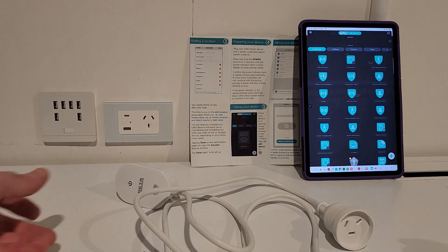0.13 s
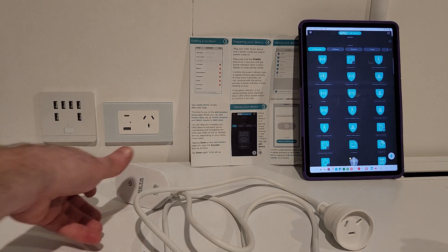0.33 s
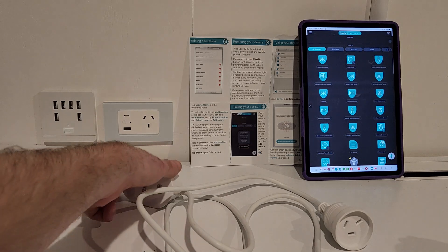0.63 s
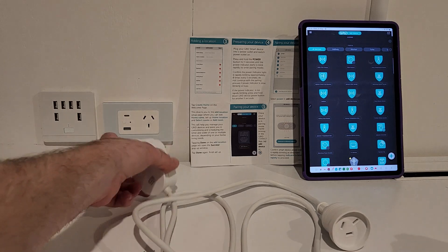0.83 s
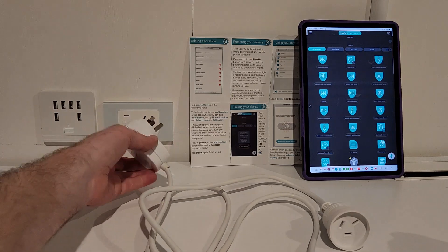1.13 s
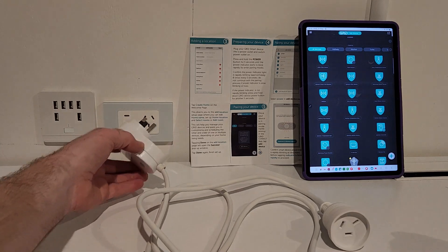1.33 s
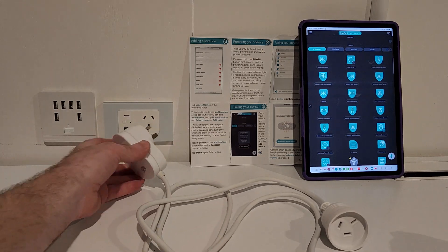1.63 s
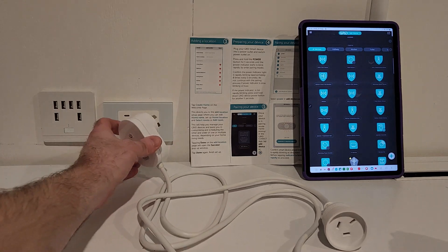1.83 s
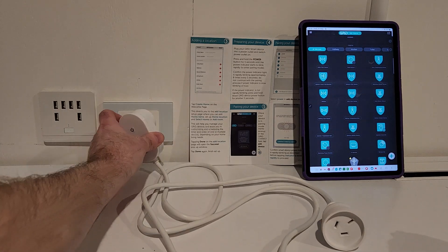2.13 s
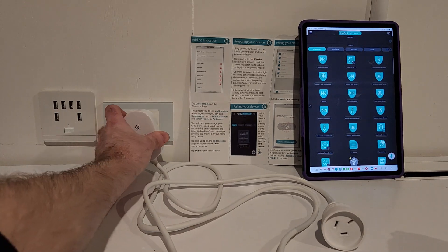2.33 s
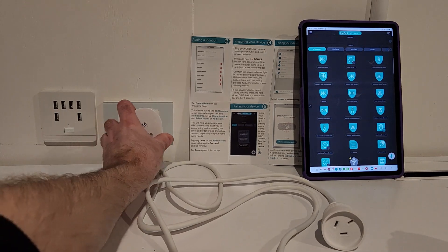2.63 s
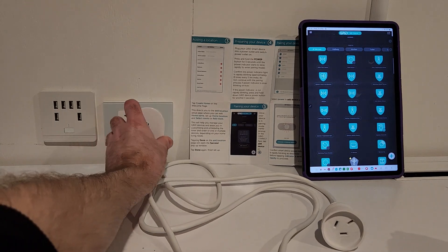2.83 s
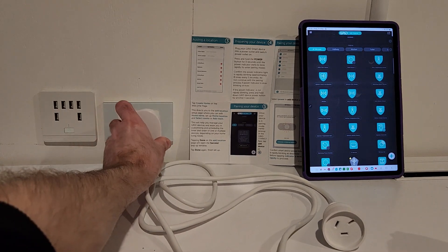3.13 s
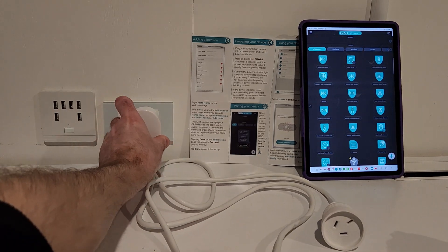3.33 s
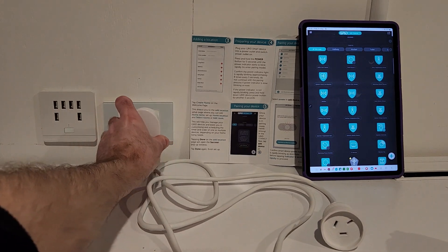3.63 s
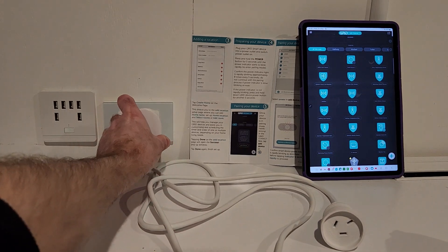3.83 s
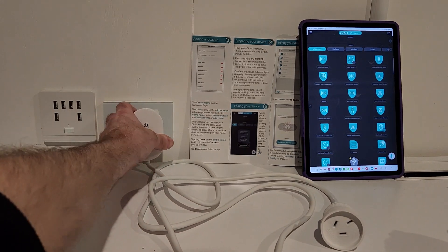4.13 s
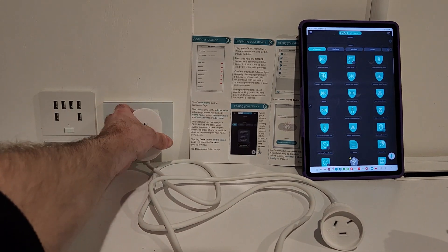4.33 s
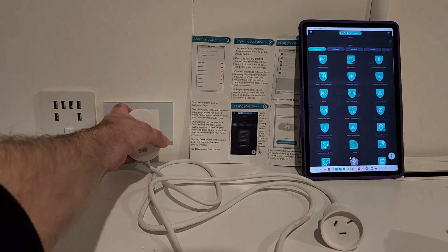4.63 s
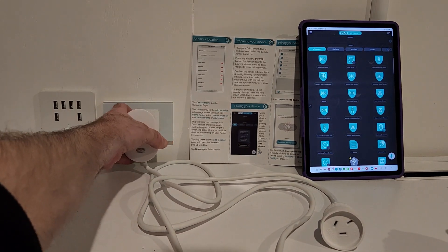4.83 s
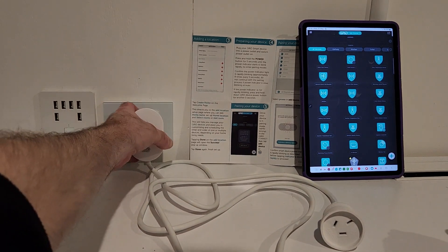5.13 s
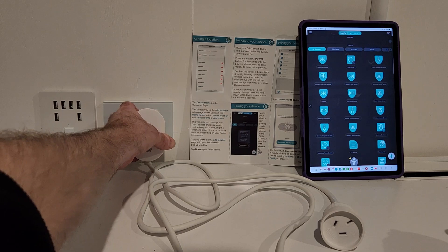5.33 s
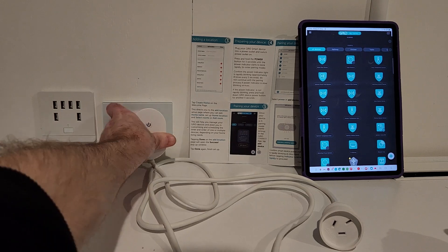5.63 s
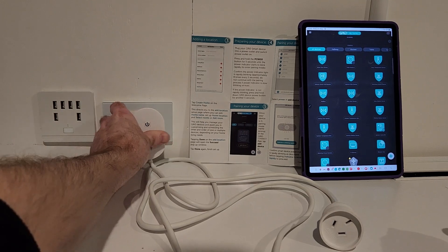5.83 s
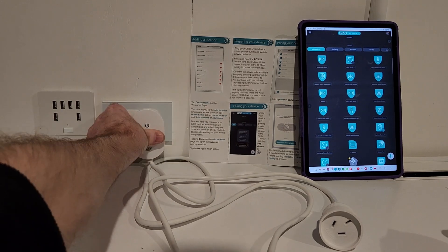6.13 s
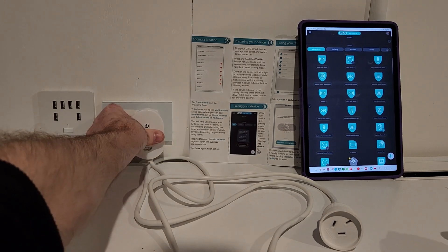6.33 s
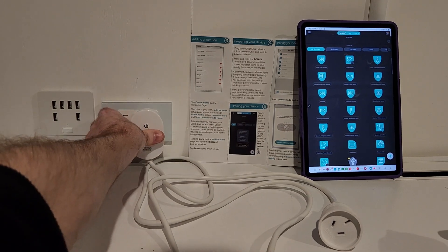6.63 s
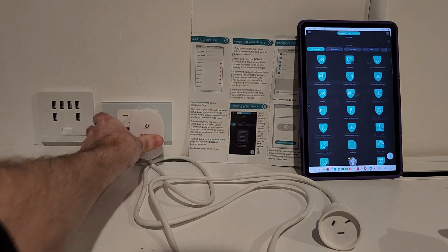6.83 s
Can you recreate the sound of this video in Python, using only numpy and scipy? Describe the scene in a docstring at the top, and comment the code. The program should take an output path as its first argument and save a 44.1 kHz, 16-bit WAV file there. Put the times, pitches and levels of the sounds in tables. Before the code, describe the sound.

A phone-like stereo microphone about half a metre away catches a plug being handled and pressed into a socket. Crisp plastic clacks come first, then soft gritty slides, a dull hollow knock, scattered taps and scrapes, and finally two heavy boxy thumps with clicking pins. The small room adds a short tail; distant traffic hums faintly through the walls.

```python
"""Small room, half a metre from a phone: a hand lifts a plastic plug off a desk and works it into a wall socket.
Pushes knock a hollow panel (decaying modes); shell and pins click (tick, grit, short modes).
Fingers and cable rub (slip noise through resonances); the room answers with a noise tail.
Traffic through the walls: drones (gliding sines), rumble, roar and whine (coloured noise), over microphone hiss."""
import sys
import numpy as np
from scipy import signal
from scipy.fft import rfft, irfft
from scipy.io import wavfile
from scipy.ndimage import uniform_filter1d

SR = 44100
rng = np.random.default_rng(int(sys.argv[2]) if len(sys.argv) > 2 else 0)


def unload_wav(signal):
    """Save mono or channel-first audio to the path in sys.argv[1] as 16-bit WAV at rate SR, clipped to [-1, 1]."""
    wavfile.write(
        sys.argv[1],
        SR,
        np.round(np.clip(np.atleast_2d(signal).T, -1, 1) * 32767).astype(np.int16),
    )


N = 308700
T = np.arange(N) / SR
RING_T = np.arange(int(.25 * SR)) / SR  # time axis of one blow


def undb(db):
    """Amplitude factor of a level in dB."""
    return 10 ** (np.asarray(db) / 20)


def on_log(table, hz, column):
    """Read a table between its rows on a log-frequency axis."""
    table = np.array(table, float)
    return np.interp(np.log(np.maximum(hz, 1)), np.log(table[:, 0]), table[:, column])


def walk(rate_hz):
    """Random levels held 1 / rate_hz s and slewed twice; spread near 1."""
    hold = int(SR / rate_hz)
    steps = np.repeat(rng.standard_normal(N // hold + 1), hold)
    return 1.514 * uniform_filter1d(uniform_filter1d(steps, hold), hold)[:N]


def add(out, start_s, sound):
    """Mix a sound in at start_s."""
    i = int(start_s * SR)
    out[:, i:i + sound.shape[1]] += sound[:, :N - i]


def resonate(x, hz, q):
    """A resonance applied twice, for steep flanks."""
    peak = signal.iirpeak(hz, q, fs=SR)
    return signal.lfilter(*peak, signal.lfilter(*peak, x))


def ring(modes, push_s, scatter_db, turn, detune, favour_db=0, together=False):
    """One blow on a set of modes, peak 1; each mode is turned in phase between the two ports."""
    hz, db, t60_s = np.transpose(modes)[:, :, None]
    level_chance, pitch_chance, turn_chance = rng.standard_normal((3, len(modes), 1))
    # neighbouring modes starting against each other make the ring swell
    sign = 1 if together else (-1) ** np.arange(len(modes))[:, None]
    decay = sign * undb(db + favour_db + scatter_db * level_chance - 60 * RING_T / t60_s)
    phase = 2 * np.pi * hz * (1 + detune * pitch_chance) * RING_T
    direct = decay * np.sin(phase)
    turned = decay * turn * np.tanh(turn_chance) * np.cos(phase)
    pair = np.array([(direct + turned).sum(axis=0), (direct - turned).sum(axis=0)])
    # a soft contact lets the ring build up
    pair *= np.sin(np.pi / 2 * np.clip(RING_T / push_s, 0, 1)) ** 2
    return pair / abs(pair.mean(axis=0)).max()


# centre of crack and hiss, and share above about 8 kHz, at brightness 0 and 1
DULL_HZ, BRIGHT_HZ = 3000, 8030
DULL_TOP_DB, BRIGHT_TOP_DB = -20, 2


def treble(bright):
    """Centre in Hz (geometric glide) and top share in dB (linear) for a brightness of 0-1."""
    centre_hz = DULL_HZ * (BRIGHT_HZ / DULL_HZ) ** bright
    return centre_hz, DULL_TOP_DB + (BRIGHT_TOP_DB - DULL_TOP_DB) * bright


def high_band():
    """Filter for the top of clicks and slides."""
    return signal.butter(2, 8500., "highpass", fs=SR, output="sos")


# stereo ports: f/Hz, likeness of left and right (-1 to 1), left minus right/dB
PORTS = [(120, 0.97, 0.5), (307, 0.84, 0), (510, 0.76, 0.5), (695, 0.06, 4), (1500, -.2, 3.5), (4020, 0, 1),
         (7600, 0, 7.5), (13000, 0.3, 3)]


def stereo_spectra(size):
    """Frequencies, then left and right noise spectra as alike as the ports hear sound from all sides."""
    hz = np.arange(size // 2 + 1) * SR / size
    like = np.clip(on_log(PORTS, hz, column=1), -1, 1)
    mid, side = rfft(rng.standard_normal((2, size))) * np.sqrt([1 + like, 1 - like])
    return hz, np.array([mid + side, mid - side])


def diffuse(colour, flicker_db, rate_hz):
    """Stereo noise of a given colour from all sides, mono RMS 1; each octave flickers alone."""
    hz, both = stereo_spectra(N)
    lean = undb(on_log(PORTS, hz, column=2) / 2)
    both = both * np.array([lean, 1 / lean]) * undb(on_log(colour, hz, column=1))
    low_hz, high_hz = colour[0][0], colour[-1][0]
    octave, out = np.log2(np.maximum(hz, 1) / low_hz), 0
    for k in range(int(np.log2(high_hz / low_hz)) + 2):
        band = irfft(both * np.clip(1 - abs(octave - k), 0, 1), N)
        out = out + band * undb(flicker_db * walk(rate_hz))
    return out / np.sqrt(np.mean(out.mean(axis=0) ** 2))


# traffic swells: t/s, rumble/dB, tyre roar/dB, top of the roar/dB
TRAFFIC = [(0.0, -46.5, -57, -61), (1.7, -46, -53.5, -62.5), (2.998, -50, -56, -65),
           (3.5, -42.5, -53.5, -65.5), (4.5, -44.5, -53.5, -64.5), (5.701, -44.5, -52.5, -60),
           (7.0, -42.5, -52, -59)]
# whine swells: t/s, level/dB
WHINE_LEVEL = [(0, -71.5), (1.7, -66), (3.2, -66), (3.6, -74.5), (7, -73.5)]
# noise colours: f/Hz, relative level per Hz/dB
RUMBLE = [(12, -59.5), (20, -18.5), (37, -5.5), (59, 6.5), (97, -8.5), (118, -10), (140, -7.5),
          (172, -16.5), (280, -38), (360, -66), (620, -120)]
ROAR = [(110, -57), (190, -12), (230, -8.5), (264, -4.5), (398, -2.5), (439, -7.5), (541, -5), (771, -5.5),
        (1300, -27), (1690, -34), (2860, -120)]
ROAR_TOP = [(700, -7), (950, 0.5), (1200, -1), (1600, -6.5), (2000, -13.5), (2600, -24), (3300, -29),
            (4500, -69)]
WHINE = [(1200, -68), (1310, -8.5), (1350, 4.5), (1400, -2), (1500, -42.5)]
HISS = [(1470, -28), (2500, -9), (2600, -25), (3010, -1.5), (3980, -4.5), (5110, -7), (5870, -7.5),
        (7590, 2), (9290, -19), (13400, -7), (16000, -20)]
HISS_DB = -82


def background():
    """Coloured noise: rumble, tyre roar and narrow whine from outside, over steady microphone hiss."""
    s, *columns = np.transpose(TRAFFIC)
    rumble, roar, top = (undb(np.interp(T, s, db)) for db in columns)
    whine = undb(np.interp(T, *np.transpose(WHINE_LEVEL)))
    outside = rumble * diffuse(RUMBLE, 1.6, 4.)
    outside += roar * diffuse(ROAR, 0.95, 2.79)
    outside += top * diffuse(ROAR_TOP, 0.74, 5.6)
    outside += whine * diffuse(WHINE, 0.49, 39.0)
    return outside + undb(HISS_DB) * diffuse(HISS, 0.4, 9.7)


# skin, cable and pins sliding: t/s, length/s, hiss level/dB, shell level/dB, shell mode f/Hz, brightness (0-1)
RUB = [ (0.588, .045, -90, -46, 400, .3), (0.624, .036, -80, -40, 500, .3),
       (0.628, 0.13, -69, -65, 1990, 0.4), (1.144, 0.089, -69, -88, 2310, 0.82),
       (1.551, 0.38, -70.5, -58, 2150, 0.05), (1.738, 0.27, -67.5, -55, 2040, 0.4),
       (1.962, 0.21, -83, -65, 1800, 0.4), (2.044, 0.074, -61, -53.5, 1360, 0.53),
       (2.136, 0.12, -73, -69, 1400, 0.6), (2.635, 0.32, -82.5, -81, 1880, 0.68),
       (3.138, .08, -67, -62, 1480, .65), (3.183, 0.079, -66, -56, 1700, 0.64),
       (3.581, 0.096, -87, -68, 2100, 0.5), (3.865, 0.11, -65, -73, 2300, 0.22),
       (4.037, 0.088, -58, -57, 1550, 0.53), (4.11, 0.066, -74, -65.5, 1520, 0.5),
       (4.878, 0.12, -69.5, -67.5, 2200, 0.52), (4.99, 0.051, -73.5, -73, 2010, 0.53),
       (5.097, 0.14, -73, -68.5, 2130, 0.52), (5.16, 0.093, -74, -60, 2400, 0.05),
       (5.356, 0.13, -66, -64.5, 2210, 0.53), (5.568, 0.13, -60.5, -55.5, 2120, 0.68),
       (5.737, 0.1, -70.5, -64.5, 2190, 0.7), (5.982, 0.15, -59.5, -46, 1800, 0.64),
       (6.058, 0.19, -62.5, -55.5, 2120, 0.6), (6.305, 0.036, -59, -75, 3000, 0),
       (6.739, 0.094, -74.5, -69.5, 1500, 0.74), ]
# modes of panel, panel upper range, plug shell, pins: f/Hz, level/dB, t60/s
PANEL = [(149.9, -5, 0.23), (221.8, -12.5, 0.36), (281.7, 4, 0.11), (338.4, -1, 0.099), (433, -12.5, 0.17)]
PANEL_UPPER = [(505, 7, 0.031), (577, -17.5, 0.044), (677.5, -6, 0.1), (809, -11, 0.065)]
SHELL = [(920, -2, .05), (1300, 3, .04), (1470, 6, .028), (1770, 8, .045), (2180, 3, .035),
         (2500, -3, .025), (3100, -2, .03)]
PINS = [(3650, -11, .03), (4270, -8, .022), (4900, -8, .02), (5550, -5, .022), (6350, -6, .022),
        (7500, -8, .014)]
RUB_RISE = 0.24  # share of a slide spent swelling
SLIPS_PER_S, SLIP_DB = 150, 5.5  # catches that stand out of the hiss; mean size before clipping
SLIP_DECAY_S = 0.0006


def rubbing():
    """Dense uneven slips swell and die: gritty hiss that stirs pin, shell and desk modes near the rub."""
    out = np.zeros((2, N))
    grit = undb(2.6 * walk(220) + 1.5 * walk(51))
    caught = rng.random(N) < SLIPS_PER_S / SR
    slips = caught * (undb(SLIP_DB * rng.exponential(size=N).clip(0, 2.5)) - 1)
    grit *= 1 + signal.fftconvolve(slips, np.exp(-T[:400] / SLIP_DECAY_S))[:N]
    top = high_band()
    for start_s, length_s, db, shell_db, shell_hz, bright in RUB:
        hiss_hz, top_db = treble(bright)
        i, size = int(start_s * SR), int(length_s * SR)
        ramp = np.interp(np.arange(size) / size, [0, RUB_RISE, 1], [0, 1, 0])
        swell = np.sin(np.pi / 2 * ramp) ** 2
        noise = rng.standard_normal((3, 2, size)) * swell * grit[i:i + size]

        shell = 0
        for hz, mode_db, _ in PANEL[3:] + PANEL_UPPER + SHELL:
            distance_oct = abs(np.log2(hz / shell_hz))
            shell = shell + undb(mode_db - 17 * distance_oct) * resonate(noise[1], hz, 6.8)
        scratch = 0
        for hz, mode_db, _ in PINS:
            distance_oct = abs(np.log2(hz / hiss_hz))
            scratch = scratch + undb(mode_db - 40 * distance_oct) * resonate(noise[0], hz, 14.)

        middle = signal.butter(2, [hiss_hz / 0.89, hiss_hz * 1.47], "bandpass", fs=SR, output="sos")
        hiss = signal.sosfilt(middle, noise[0]) + undb(16) * scratch
        fizz = signal.sosfilt(top, noise[2])
        mix = undb(db) * hiss / hiss.std()
        mix += undb(shell_db) * shell / shell.std()
        mix += undb(db + top_db) * fizz / fizz.std()
        add(out, start_s, np.sqrt(np.mean(swell ** 2)) * mix)
    return out * undb([[-.6], [.6]])


# reverberation: f/Hz, t60/s
ROOM = [(250, 0.3), (700, 0.49), (2000, 0.35), (5000, 0.29), (11000, 0.4)]


def room(x):
    """Decaying noise tail, band by band; the bass is alike at both ports."""
    size = int(.6 * SR)
    t = np.arange(size) / SR
    hz, both = stereo_spectra(size)
    centres = np.log(np.array(ROOM)[:, 0])
    tail = 0
    for k, (_, t60_s) in enumerate(ROOM):
        share = np.interp(np.log(hz + 1), centres, np.arange(len(ROOM)) == k)
        tail = tail + irfft(both * share, size) * undb(-60 * t / t60_s)
    # first reflections come from desk and wall
    tail *= np.clip((t - .001) / 0.002, 0, 1) * (1 + 0.55 * np.exp(-t / 0.057))
    tail /= np.sqrt((tail ** 2).sum() / 2)
    return signal.fftconvolve(x.mean(axis=0)[None], tail, axes=1)[:, :N]


# blows on panel and desk: t/s, level/dB, share of the upper modes/dB, push/ms
KNOCKS = [(0.628, -31, 2, 2.1), (0.78, -32, 3, 2.5), (0.871, -32, 3, 2.6), (2.265, -14.5, -14, 4.1),
          (2.287, -27, -7.5, 9.2), (2.31, -31.5, -12, 5.1), (3.176, -35, -21, 15), (3.223, -35.5, -12, 14),
          (3.728, -16, -18.5, 2.9), (3.788, -31, -20, 9), (3.876, -33, -28, 13), (4.057, -25, -22, 7.5),
          (4.15, -24, -17, 4), (4.696, -35.5, -28, 12), (5.007, -22, -14.5, 5.5), (5.105, -26.5, -20, 7.6),
          (5.145, -30.5, -19, 12), (5.162, -26, -18, 16), (5.194, -33, -11, 6.6),
          (5.4411, -6.5, -18.5, 3.5), (5.4564, -15, -14.5, 3.7), (5.607, -25, -22, 6.8),
          (5.629, -28, -17, 12), (5.983, -30, -25.5, 15), (6.008, -33.5, -7, 8.4),
          (6.0393, -8.5, -11.5, 1.67), (6.153, -29, 6.5, 0.94), (6.161, -35, 2.5, 3), (6.18, -38.5, 8, 7.1),
          (6.783, -34.5, 0, 9.8)]
HARD_MS = 2  # shorter pushes start the modes together


def knocks():
    """The hollow panel thumps; its close modes beat until the pressing hand stills them."""
    out = np.zeros((2, N))
    still = 0.28 + 0.5 / (1 + (RING_T / 0.029) ** 6)
    for s, db, upper_db, push_ms in KNOCKS:
        push_s = push_ms / 1000
        thump = ring(PANEL, push_s, .7, .1, .006, together=push_ms < HARD_MS)
        thump += undb(upper_db) * ring(PANEL_UPPER, push_s, 1.2, .6, .015)
        add(out, s - .0006, -undb(db) * thump * still)
    return out * undb([[.45], [-.45]])


# clicks of shell and pins: t/s, treble level/dB, shell level/dB, favoured shell mode f/Hz,
# brightness (0-1), contact/ms
CLICKS = [ (.628, -23.5, -34.5, 1700, 0.83, 2.37), (.728, -59, -53, 2310, 0, 2),
          (.745, -52, -52, 1545, 0.2, 2.2), (.756, -46, -43.5, 1720, 0, 1.7),
          (0.763, -48, -52, 1720, .6, 2.8), (0.7823, -17.5, -21.5, 1500, 0.35, 0.94),
          (0.8734, -19, -20.5, 1800, 0.73, 1.1), (1.0132, -51, -61, 1370, 1, 2.9),
          (1.536, -74, -47.5, 1370, 0.06, 2.7), (1.582, -69, -44.5, 1290, 0.1, 3.4),
          (1.639, -54, -40, 1290, 0.4, 3.3), (2.043, -52, -46, 1450, 0.5, 2.7),
          (2.052, -58, -55, 1450, .45, 1.6), (2.068, -52, -45.5, 1400, .6, 3),
          (2.079, -60, -40, 1400, .5, 3), (2.088, -60, -40, 1400, .5, 3), (2.207, -70, -46, 1420, 0.3, 3.8),
          (2.2654, -33, -32, 1420, 0.44, 2.6), (2.29, -41.5, -41.5, 1480, 0.4, 6),
          (2.303, -61, -48, 1480, 0.4, 2), (2.649, -53.5, -69, 1360, 0.74, 3.6),
          (2.691, -76, -49, 1500, 0.1, 2.7), (3.204, -51, -41.5, 1450, 0.2, 3.5),
          (3.2147, -36.5, -36, 1600, 0.87, 8.3), (3.227, -46, -42, 1500, 0.3, 3),
          (3.236, -48, -43, 1750, 0.93, 5.3), (3.688, -49.5, -66, 1300, 1, 2.6),
          (3.728, -45, -37, 1340, 0.4, 2.6), (3.887, -53, -70, 2300, 0, 2.4),
          (3.898, -60, -70, 2300, 0.5, 3), (3.917, -43, -67, 2300, 0.88, 2.5),
          (4.0145, -55, -49.5, 1540, 0.9, 3.4), (4.057, -35, -37, 1500, 0.9, 6.7),
          (4.124, -45.5, -42, 1530, 0.92, 4.7), (4.149, -62, -52, 1890, 0.6, 3),
          (4.695, -47, -62, 1330, 0.83, 1.44), (5.193, -51.5, -44.5, 1370, 0.1, 3),
          (5.3143, -49, -56, 1150, 1, 3.2), (5.441, -35, -30.5, 1690, 0.89, 4.3),
          (5.45, -32.5, -28.5, 1900, 0, 3.2), (5.459, -37, -33, 2520, 0.7, 5.3),
          (5.5375, -56, -43.5, 1300, .1, 1.4), (5.602, -41, -45, 1240, 0.97, 6),
          (5.622, -34.5, -37.5, 1930, 0.63, 3), (5.939, -51, -69, 1390, 0.8, 3.4),
          (6.0392, -15, -16.5, 1550, 0.75, 3.6), (6.105, -33.5, -52, 2070, 0.9, 4.4),
          (6.152, -48.5, -36, 1500, 0, 2.5), (6.318, -45, -48, 1810, 0, 2.2),
          (6.724, -69, -57, 1400, 0.5, 1.7), (6.778, -62, -49, 1420, 0.4, 2.7), ]
PINS_DB = -7.5  # share of the pin modes in the crack


def clicks():
    """A tick, a gritty contact of a few ms, then a short ring of the shell modes nearest the place struck.
    Second output: the same blows averaged over all directions, smooth in colour, as the walls receive them."""
    near, around = np.zeros((2, N)), np.zeros((2, N))
    top = high_band()
    shell_mode_hz, pin_mode_hz = np.array(SHELL)[:, :1], np.array(PINS)[:, :1]
    tick = -np.exp(-((RING_T - .0002) / .00004) ** 2)
    for s, db, shell_db, struck_hz, bright, contact_ms in CLICKS:
        crack_hz, top_db = treble(bright)
        contact_s = contact_ms / 1000
        edge = min(0.00084 / contact_s, 1) ** 2 * tick  # long contacts have little edge
        grit_shape = np.exp(-RING_T / contact_s) * np.clip(RING_T / (0.16 * contact_s), 0, 1)
        grit = rng.standard_normal((2, len(RING_T))) * undb(-19.5) * grit_shape
        middle = signal.butter(2, [crack_hz / 3.1, crack_hz * 1.73], "bandpass", fs=SR, output="sos")
        crack = signal.sosfilt(middle, edge + grit)
        fizz = signal.sosfilt(top, edge + grit)

        shell_favour_db = -24 * abs(np.log2(shell_mode_hz / struck_hz))
        shell = ring(SHELL, .15 * contact_s, .8, 1.2, .008, favour_db=shell_favour_db)
        shell += 3.3 * edge
        pin_favour_db = -14 * abs(np.log2(pin_mode_hz / crack_hz))
        pins = ring(PINS, .1 * contact_s, 2.5, 1.3, .015, favour_db=pin_favour_db)

        parts = [crack / abs(crack).max() + undb(PINS_DB) * pins,
                 undb(top_db) * fizz / abs(fizz).max(),
                 undb(shell_db - db) * shell]
        add(near, s, undb(db) * sum(parts))

        body = signal.butter(1, [struck_hz / 2.0, struck_hz * 1.36], "bandpass", fs=SR, output="sos")
        for part, band in zip(parts, (middle, top, body)):
            smooth = signal.sosfilt(band, tick)[None]
            same_energy = np.sqrt(np.sum(part ** 2) / 2 / np.sum(smooth ** 2))
            add(around, s, undb(db) * same_energy * smooth)
        add(around, s, undb(db - 10.0) * parts[2])  # a trace of the shell's ring carries into the room
    return near * undb([[-1.2], [1.2]]), around


# engine tones: start t/s, end t/s, first f/Hz, last f/Hz, first level/dB, last level/dB
DRONES = [(2, 3.9, 124, 144, -54.5, -52), (5, 7.4, 73.5, 72, -39.5, -41.5), (4, 8, 55, 79, -56, -45),
          (2.0, 2.87, 69, 87, -50, -50), (2, 3.2, 50, 59, -42.5, -49.5), (1.2, 1.7, 30, 54, -50, -50.5),
          (3.0, 4.7, 140, 180, -58.5, -56.5), (1.0, 1.93, 303, 300, -62, -55)]
DRONE_FADE_S = 0.41


def drones():
    """Engine tones: gliding sines that waver in pitch and level and fade in and out."""
    out = 0
    for start_s, end_s, first_hz, last_hz, first_db, last_db in DRONES:
        span = [start_s, end_s]
        fade = np.clip(np.minimum(T - start_s, end_s - T) / DRONE_FADE_S, 0, 1)
        hz = np.interp(T, span, [first_hz, last_hz]) + 0.5 * walk(4.5)
        tone = np.sin(2 * np.pi * np.cumsum(hz) / SR + rng.uniform(0, 2 * np.pi))
        level_db = np.interp(T, span, [first_db, last_db]) + 2.9 * walk(3.82)
        out = out + np.sqrt(2) * fade * undb(level_db) * tone
    return out


def scene():
    """Sum the direct sounds, the room's answer to the handling, and the traffic."""
    thumps, (ticks, spread), rubs = knocks(), clicks(), rubbing()
    wet = room(undb(-8) * thumps + undb(-4.0) * spread + undb(2.0) * rubs)
    return thumps + ticks + rubs + wet + drones() + background()


TOP_HZ = 15900


def record(dry):
    """The phone cuts the top: steep elliptic low-pass."""
    return signal.sosfilt(signal.ellip(8, .2, 70, TOP_HZ, fs=SR, output="sos"), dry)


dry = scene()
out = record(dry)
unload_wav(out)
```